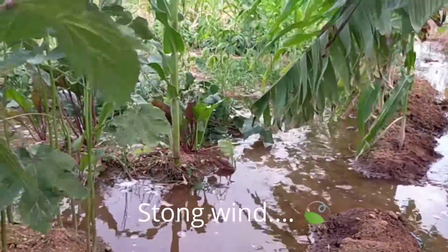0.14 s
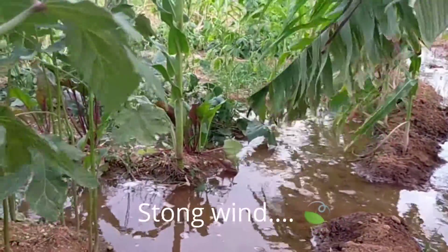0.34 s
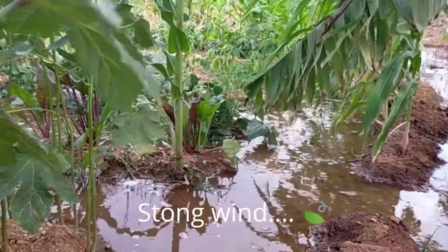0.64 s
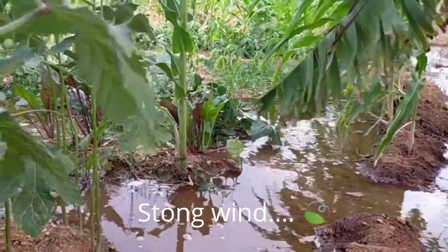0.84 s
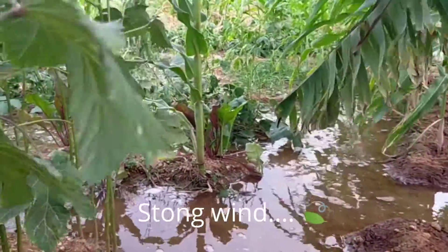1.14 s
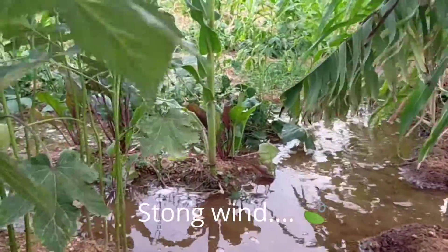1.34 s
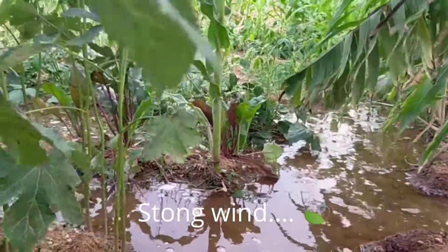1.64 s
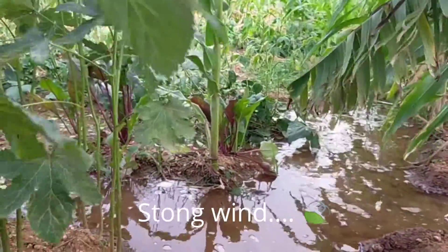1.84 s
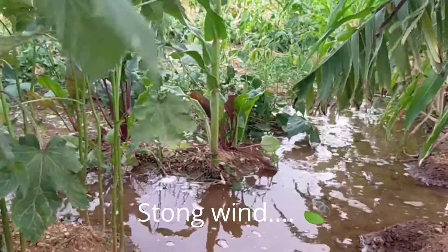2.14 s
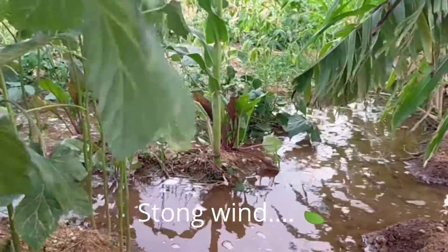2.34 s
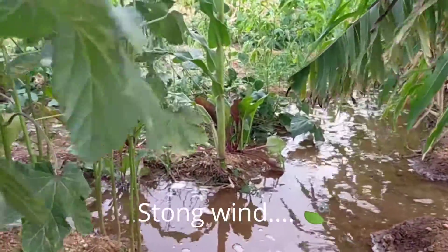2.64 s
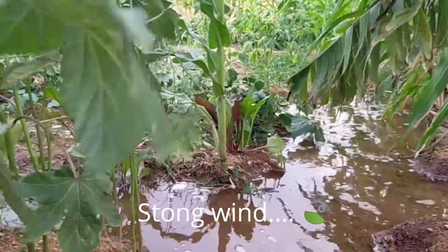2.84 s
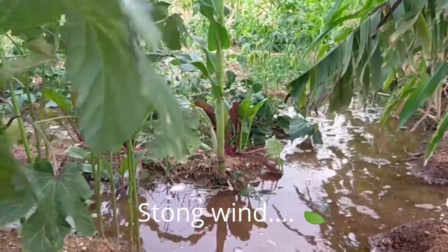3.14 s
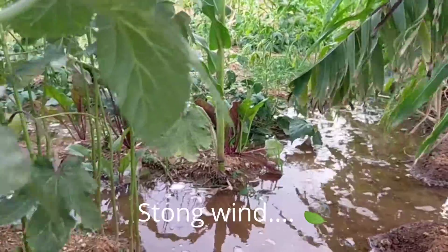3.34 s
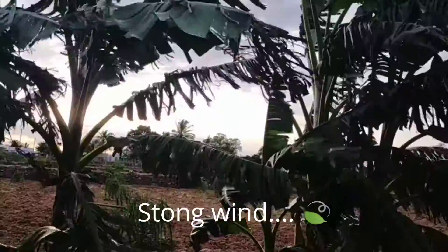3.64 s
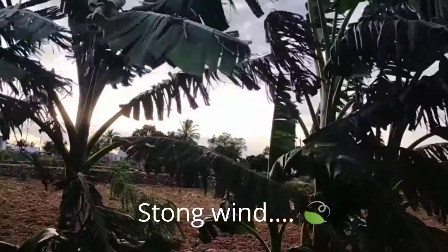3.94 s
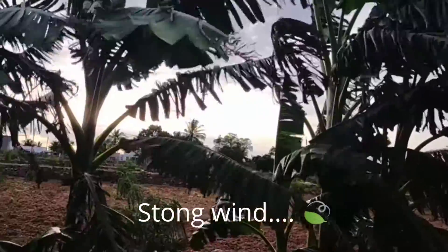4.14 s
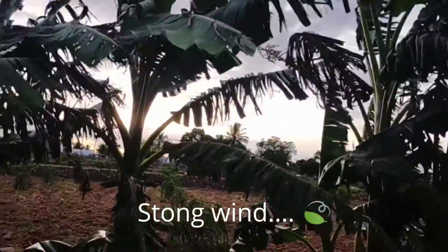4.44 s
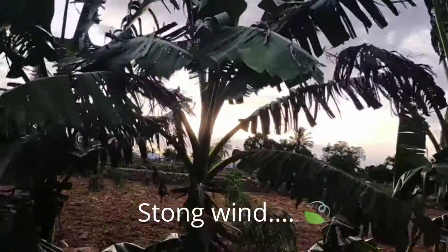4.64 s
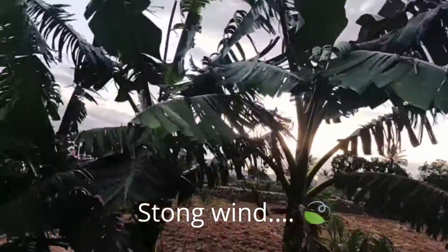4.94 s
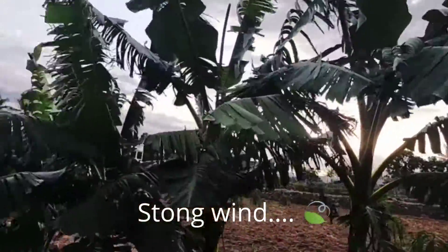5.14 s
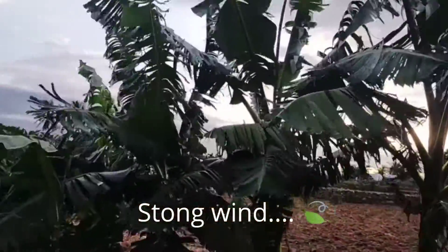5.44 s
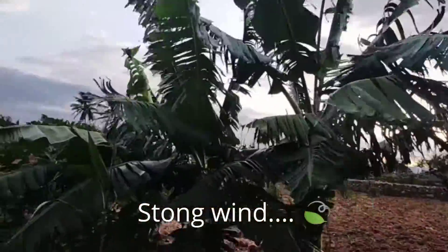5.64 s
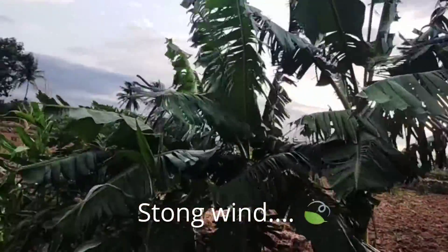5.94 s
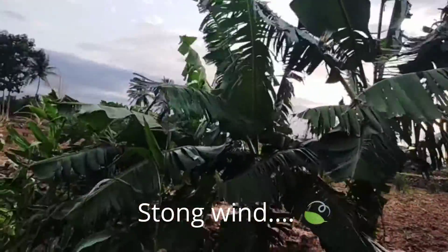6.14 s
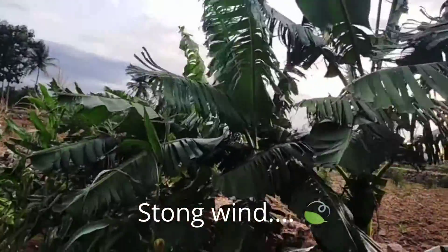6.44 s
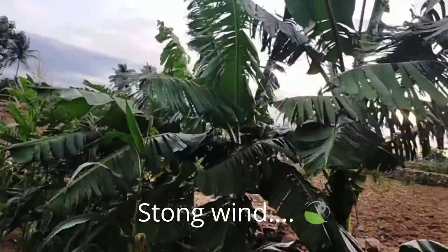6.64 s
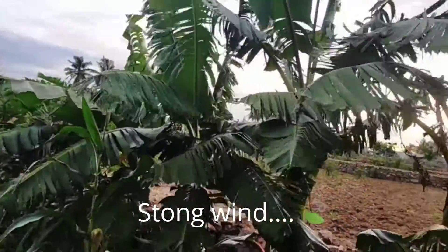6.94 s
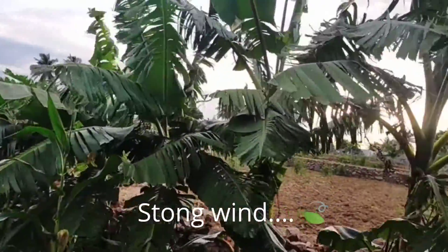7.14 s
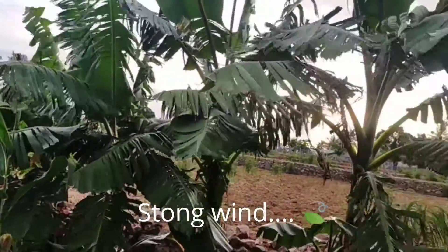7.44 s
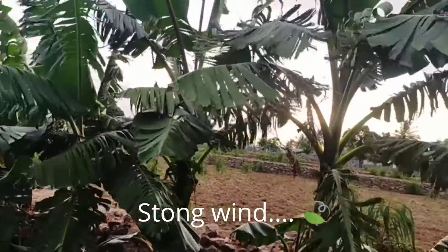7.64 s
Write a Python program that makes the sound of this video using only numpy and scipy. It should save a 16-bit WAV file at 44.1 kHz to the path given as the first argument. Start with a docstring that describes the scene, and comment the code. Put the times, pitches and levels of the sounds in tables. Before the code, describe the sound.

Strong wind in a garden sets maize leaves rustling in a dense, ticking hiss from the start, while uneven gusts rumble on the microphone. Single leaves slap close by, and dry ones snap sharply at about 1.8 and 2 seconds. Low thumps of wind strike near 1.6, 2.7 and 3.1 seconds, with the hardest buffeting around 3.5 seconds. At 3.7 seconds the sound changes abruptly to a slightly quieter banana grove. Torn leaf strips patter against each other over a fluttering hiss, with frequent light slaps and occasional small cracks, and the wind on the microphone is much softer. Two faint, brief, thin whistles sound far off at about 4.5 and 4.9 seconds. Between 5 and 6 seconds the hiss grows a little duller as the microphone turns aside. Rustling, tapping and light gusts continue until the end, near 7.8 seconds.

```python
"""Strong wind in a garden. First maize rustles, countless leaf contacts summing to a dense hiss,
while turbulence buffets the microphone; single leaves slap and dry ones snap close by.
At 3.7 s the place changes abruptly to a quieter banana grove, whose torn leaf strips patter
against each other. Two faint whistles sound far off, and the colour of the hiss shifts
as the microphone is turned aside."""
import sys
import numpy as np
from scipy import signal
from scipy.fft import rfft, irfft, next_fast_len
from scipy.io import wavfile
from scipy.ndimage import uniform_filter1d

SR = 44100
rng = np.random.default_rng(int(sys.argv[2]) if len(sys.argv) > 2 else 0)


def materialize(psi):
    """Save the field psi as 16-bit PCM at rate SR to the path in sys.argv[1].

    A 1-D psi becomes a single channel; in a 2-D psi each row is a channel.
    """
    bounded = np.clip(np.atleast_2d(psi).T, -1, 1)
    quanta = np.round(bounded * 32767).astype(np.int16)
    wavfile.write(sys.argv[1], SR, quanta)


N = 343539
T = np.arange(N) / SR


def amp(db):
    """Amplitude ratio of a level in decibels."""
    return 10 ** (np.asarray(db) / 20)


def unit(x):
    """Normalisation to an rms of 1."""
    return x / np.sqrt(np.mean(x ** 2) + 1e-20)


def curve(rows, t):
    """Linear interpolation of each column of a time table at the times t."""
    times, *columns = np.transpose(rows)
    return [np.interp(t, times, column) for column in columns]


def spectrum_db(points, hz):
    """Interpolation of a spectrum on a logarithmic frequency axis."""
    point_hz, db = np.transpose(points)
    return np.interp(np.log(hz + 1), np.log(point_hz + 1), db)


def add(mix, start, sound):
    """Superposition: a sound joins the mix at its start time in seconds."""
    part = mix[max(round(start * SR), 0):][:len(sound)]
    part += sound[:len(part)]


def colour(x, points):
    """Linear filtering: the spectrum is multiplied by a gain curve."""
    size = next_fast_len(len(x))
    gain = amp(spectrum_db(points, np.fft.rfftfreq(size, 1 / SR)))
    return irfft(rfft(x, size) * gain, size)[:len(x)]


def short_spectra(x):
    """Short-time Fourier analysis: frequencies, times and spectra (bins x frames)."""
    return signal.stft(x, SR, nperseg=512, noverlap=384)


def waveform(spectra):
    """Overlap-add synthesis of sound from short-time spectra."""
    return signal.istft(spectra, SR, nperseg=512, noverlap=384)[1][:N]


def patches(shape, size):
    """Correlated noise of rms 1: a moving average over size = (bins, time steps)."""
    across_bins = uniform_filter1d(rng.standard_normal(shape), size[0], axis=0)
    return unit(uniform_filter1d(across_bins, size[1], axis=1))


def fluctuation(samples):
    """Random modulation of rms 1, correlated over the given number of samples."""
    return patches((1, N), size=(1, samples))[0]


def scatter(x, t60, wet_db):
    """Diffuse scattering: surrounding leaves return a short, exponentially decaying tail."""
    t = T[:4096]
    tail = rng.standard_normal(len(t)) * amp(-60 * t / t60) * (t > .001)
    return x + amp(wet_db) * signal.oaconvolve(x, tail / np.linalg.norm(tail))[:N]


def leaf_contact(hz, length):
    """Damped oscillation: one contact excites a few cycles that swell fast and die."""
    t = T[:1024]
    age = 3 * t / length
    return age * np.exp(1 - age) * np.sin(2 * np.pi * hz * t)


def patter(per_s, low_hz, high_hz, cycles, spread_db):
    """Shot noise: leaves of many pitches touch at random, a few of them hard."""
    out = np.zeros(N)
    pitches = np.geomspace(low_hz, high_hz, 32)
    for hz in pitches:
        when, strength, chance = rng.random((3, 1500))
        weight = np.minimum(-np.log(strength + 1e-9), 3)  # capped exponential distribution
        touches = chance < per_s * N / SR / len(pitches) / len(when)
        hits = np.bincount((when * N).astype(int), amp(spread_db * weight) * touches, N)
        length = cycles * rng.uniform(0.53, 2.4) / hz
        out += signal.oaconvolve(hits, leaf_contact(hz, length))[:N]
    return unit(out)


def crackling(per_s, spread_db):
    """Random impulses: dry leaf edges catch in clicks too brief to have a pitch."""
    # spectrum of the catching edges: (frequency [Hz], relative level [dB])
    edge_spectrum = [(500, -16), (2500, -10), (5000, -3), (7000, -6), (10000, 3), (15000, -3)]
    strength, chance, sign = rng.random((3, N))
    weight = np.minimum(-np.log(strength + 1e-9), 3.5)
    clicks = amp(spread_db * weight) * np.sign(sign - .5) * (chance < per_s / SR)
    return unit(colour(scatter(clicks, t60=0.011, wet_db=-5.5), edge_spectrum))


def maize():
    """Incoherent summation: many thin leaves merge into a hiss, the nearer ones ticking through it."""
    # strength of the wind-driven rustle: (time [s], relative level [dB])
    rustle_levels = [(0, -40.3), (.2, -41), (.7, -41), (1.15, -42.5), (1.39, -41), (2, -43), (2.45, -42.5),
                     (2.9, -43), (3.69, -41.8)]
    # spectrum of the rustle: (frequency [Hz], relative level [dB])
    rustle_spectrum = [(100, -20), (300, -7), (480, -10.5), (1000, -7), (1600, -5), (2150, 0.5), (2650, -1),
                       (3350, -14.5), (4150, -15), (5300, -5.5), (6600, -5), (8100, -19), (9600, -16.5),
                       (13200, -18.5), (15000, -19)]
    ticks = amp(-17.5) * patter(per_s=300, low_hz=1303, high_hz=3090, cycles=1.96, spread_db=4.0)
    crackle = amp(-11) * crackling(per_s=300, spread_db=9.0)
    hz, _, spectra = short_spectra(rng.standard_normal(N) + ticks + crackle)
    flicker_db = 1.1 * patches(spectra.shape, size=(10, 14))
    spectra *= amp(spectrum_db(rustle_spectrum, hz)[:, None] + flicker_db)
    rustle_db, = curve(rustle_levels, T)
    return unit(waveform(spectra)) * amp(rustle_db + 5.0)


def airflow_db():
    """Addition of powers: gusts swell and die on top of a fluttering breeze."""
    # breeze on the microphone between gusts: (time [s], relative level [dB])
    breeze_levels = [(0, -49.5), (.45, -44), (.95, -55.5), (1.5, -45.5), (1.95, -52.5), (2.25, -54),
                     (2.55, -47), (3.6, -46.5), (4.2, -57), (5.25, -53), (6.1, -60.5), (6.65, -58.5),
                     (7.79, -61)]
    # gusts on the microphone: (peak time [s], relative level [dB], duration [s])
    gusts = [(0.237, -37, 0.1), (0.32, -36.5, 0.11), (.55, -46, .06), (0.737, -40.5, 0.098),
             (1.07, -41.5, .09), (1.32, -44, .06), (1.645, -35.5, .14), (2.715, -38, 0.12),
             (3.08, -38.5, 0.076), (3.253, -38.5, .07), (3.465, -23.5, 0.074), (3.647, -34.5, .06),
             (3.764, -42, 0.15), (4.138, -49, 0.08), (4.348, -48, .04), (4.554, -48.5, 0.11),
             (4.69, -45, .07), (4.92, -46.5, 0.14), (5.117, -50, 0.065), (5.6, -49, .17),
             (5.888, -53, 0.055), (6.475, -52, 0.056), (6.877, -46.5, 0.18), (7.32, -52.5, 0.045),
             (7.425, -57.5, 0.045), (7.78, -43.5, 0.07)]
    flutter_db = 2.5
    rise_share, edge_db = .45, 7  # part of a gust spent rising; depth of its ends below the peak
    breeze_db, = curve(breeze_levels, T)
    power = amp(breeze_db + flutter_db * fluctuation(samples=2600)) ** 2
    for peak_time, db, length in gusts:
        from_peak = np.maximum((peak_time - T) / rise_share, (T - peak_time) / (1 - rise_share)) / length
        near = from_peak < 4
        power[near] += amp(db - edge_db * from_peak[near] ** 1.6) ** 2
    return 10 * np.log10(power)


def buffeting():
    """Turbulent pressure on the microphone: harder gusts carry smaller eddies and sound higher."""
    # rumble of a light gust: (frequency [Hz], relative level [dB])
    light_spectrum = [(8, -6.5), (22, 7.5), (45, 1), (85, -1.5), (130, -12), (200, -16.5), (320, -27),
                      (700, -44), (2000, -90)]
    # rumble of a hard gust: (frequency [Hz], relative level [dB])
    hard_spectrum = [(8, -12), (25, -4), (50, -10), (85, 10), (135, -0.5), (190, -1), (260, -19),
                     (340, -14.5), (480, -41), (900, -57), (2000, -90)]
    hard_from_db, hard_range_db, pickup_db = -35.5, 8, -3
    air_db = airflow_db()
    hardness = np.clip((air_db - hard_from_db) / hard_range_db, 0, 1)
    puffs = rng.standard_normal(N) * amp(3.0 * fluctuation(samples=900))
    light, hard = unit(colour(puffs, light_spectrum)), unit(colour(puffs, hard_spectrum))
    rumble = (1 - hardness) * light + hardness * hard
    audible = signal.sosfiltfilt(signal.butter(2, 40, "high", fs=SR, output="sos"), rumble)
    running_rms = np.sqrt(uniform_filter1d(audible ** 2, size=4000) + 1e-6)
    return rumble / running_rms * amp(air_db + pickup_db)  # the airflow alone sets the strength


def slaps():
    """Impact and friction: a hollow pat, and a scuff that lasts as long as the leaves touch."""
    # loudest leaf collisions: (time [s], relative level [dB], frequency [Hz], duration [s])
    collisions = [(0.528, -28.5, 2550, 0.0026), (1.807, -24.5, 2290, 0.0015), (1.968, -24.5, 2120, 0.002),
                  (2.277, -31, 2410, 0.0033), (2.411, -28, 2300, .0017), (3.264, -28, 1470, 0.0017),
                  (3.797, -32, 1790, .003), (4.066, -32, 3320, 0.001), (4.376, -34, 3250, 0.0016),
                  (4.499, -38, 2360, .011), (4.681, -29.5, 3280, 0.0018), (4.758, -34, 3140, 0.0026),
                  (4.867, -33.5, 2220, 0.024), (5.0997, -24.5, 2510, 0.00046), (5.164, -36.5, 2290, .012),
                  (5.177, -34.5, 2070, .015), (5.256, -35.5, 1300, .0016), (5.454, -38, 1830, 0.0036),
                  (5.554, -26.5, 2370, 0.0012), (5.675, -26, 2150, 0.0036), (5.696, -30, 2150, .0039),
                  (5.957, -35, 2090, .0035), (6.085, -24.5, 2070, 0.0029), (6.288, -38, 2060, .0025),
                  (6.462, -33, 2040, 0.003), (6.6495, -39, 2470, 0.0029), (6.699, -29.5, 2200, 0.0045),
                  (6.7554, -34.5, 1920, 0.0047), (7.134, -37, 2350, .003), (7.2075, -34.5, 2550, 0.0036),
                  (7.274, -34.5, 2570, .0028), (7.32, -31, 2390, .002), (7.421, -34, 2390, .0024),
                  (7.515, -35.5, 2380, .006), (7.564, -30, 2710, 0.0014), (7.58, -34, 1760, .005),
                  (7.685, -35, 2560, .002)]
    # friction noise of two leaves meeting: (frequency [Hz], relative level [dB])
    scuff_spectrum = [(300, -20), (900, -14), (2200, 6), (3500, 0), (5000, -32), (15000, -34)]
    out = np.zeros(N)
    for start, db, hz, length in collisions:
        pat = leaf_contact(hz, min(length, .004))
        age = 3 * T[:len(pat)] / max(length, .001)
        friction = unit(colour(rng.standard_normal(len(pat)), scuff_spectrum))
        scuff = friction * age * np.exp(1 - age)
        add(out, start, amp(db) * (pat + amp(-10) * scuff))
    return amp(1.8) * scatter(out, t60=.03, wet_db=-14)


def thumps():
    """Pressure pulses: a single eddy gives the microphone a quick push, then a shallow suction."""
    # eddies striking the microphone: (time [s], peak level [dB], time constant [s])
    eddies = [(1.615, -26.5, 0.0065), (2.7002, -24.5, 0.00077), (2.722, -34, 0.019), (3.077, -25, 0.01),
              (3.431, -21.5, .0043), (3.475, -18, 0.0034), (3.643, -26, 0.0072)]
    out = np.zeros(N)
    for start, db, time_constant in eddies:
        age = T[:8192] / time_constant
        pressure = age * (1 - age / 2) * np.exp(-age)
        add(out, start, amp(db) * pressure / pressure.max())
    return out


def snaps():
    """Brittle fracture: a dry leaf cracks in a bright burst about a millisecond long."""
    # leaves cracking close by: (time [s], peak level before scattering [dB])
    fractures = [(1.8047, -17), (1.827, -21), (1.9452, -26), (1.9669, -9), (1.982, -24), (4.052, -33),
                 (4.138, -30), (4.4732, -32), (4.9393, -28.5), (5.069, -26), (5.7875, -28.5), (6.5041, -36)]
    # spectrum of a crack: (frequency [Hz], relative level [dB])
    crack_spectrum = [(500, -36), (2000, -28), (3500, -13), (5500, -7.5), (7700, -16), (9300, 0.5),
                      (11200, 1.5), (13000, -9), (15000, -7.5)]
    out, t = np.zeros(N), T[:512]
    lead = 64  # samples of room for the filter's spread ahead of the burst
    for start, db in fractures:
        splits = rng.choice([-1., 1.], len(t)) * np.exp(-t / .0006)
        crack = colour(np.pad(splits, (lead, 0)), crack_spectrum)
        add(out, start - lead / SR, amp(db) * crack / abs(crack).max())
    return scatter(out, t60=0.061, wet_db=-11.5)


def grove():
    """Directional pickup: the microphone's heading colours the banana leaves' hiss and patter."""
    # strength of the wind-driven rustle: (time [s], relative level [dB])
    rustle_levels = [(3.71, -41), (4.14, -44), (4.73, -46), (5.22, -45), (5.61, -42), (6.65, -42),
                     (6.87, -42.5), (7.43, -41), (7.79, -42.5)]
    # rustle with the microphone facing the first trees: (frequency [Hz], relative level [dB])
    facing_spectrum = [(120, -10.5), (480, -9.5), (850, -3.5), (1050, -4.5), (1400, -2.5), (2300, 1.5),
                       (3350, 2), (4150, -7), (5200, -9), (6300, -9.5), (7900, -17), (10500, -12.5),
                       (13500, -18), (15000, -15.5)]
    # rustle with the microphone turned aside: (frequency [Hz], relative level [dB])
    aside_spectrum = [(120, -12), (450, -13.5), (820, -8.5), (1050, -10.5), (1600, -8), (2350, 1.5),
                      (3300, -5.5), (4100, -17), (5100, -22.5), (6100, -18), (8250, -26), (9500, -17.5),
                      (13200, -25), (15000, -23.5)]
    # microphone heading: (time [s], share turned aside [0-1], treble peak [Hz], peak gain [dB])
    headings = [(3.7, 0.33, 10300, 6), (4.3, 0.04, 10500, 6), (4.65, 0, 10700, 8.5), (5.1, 0.16, 10800, 5),
                (5.3, 0.36, 9900, 9.5), (5.5, 0.63, 9300, 5), (5.9, 1, 10100, 1.5), (7.79, 1, 10200, -0.5)]
    flurries = amp(1.3 * fluctuation(samples=2200))
    strips = amp(-12.0) * patter(per_s=330, low_hz=1220, high_hz=3650, cycles=4.9, spread_db=3.0)
    crackle = amp(-5) * crackling(per_s=280, spread_db=6.0)
    hiss = rng.standard_normal(N) * amp(1.6 * fluctuation(samples=350))  # whole blades brush together
    hz, t, spectra = short_spectra(hiss + flurries * (strips + crackle))
    hz = hz[:, None]
    aside, peak_hz, peak_db = curve(headings, t)
    heading_db = (1 - aside) * spectrum_db(facing_spectrum, hz) + aside * spectrum_db(aside_spectrum, hz)
    treble_db = peak_db * np.exp(-((hz - peak_hz) / 850) ** 2)
    sizzle_db = 7 * (1 - aside) ** 2 * np.exp(-((hz - 0.472 * peak_hz) / 450) ** 2)  # about an octave down
    flicker_db = 1.12 * patches(spectra.shape, size=(4, 14))
    spectra *= amp(heading_db + treble_db + sizzle_db + flicker_db)
    rustle_db, = curve(rustle_levels, T)
    return unit(waveform(spectra)) * amp(rustle_db - 0.17)


def whistles():
    """Frequency and amplitude modulation: a wavering tone's pitch and level follow one arch."""
    # faint, thin notes far off: (time [s], duration [s], top frequency [Hz], peak level [dB])
    notes = [(4.524, 0.115, 1328, -49), (4.87, 0.107, 1300, -50)]
    arch_depth = 0.084  # share of the top frequency by which a note rises and falls
    out = np.zeros(N)
    for start, length, top_hz, db in notes:
        arch = np.sin(np.pi * T[T < length] / length)
        waver = 1 + 0.021 * fluctuation(samples=150)[:len(arch)]
        hz = top_hz * (1 - arch_depth * (1 - arch)) * waver
        add(out, start, amp(db) * arch * np.sin(2 * np.pi * np.cumsum(hz) / SR))
    return out


def scene():
    """Superposition in one channel: maize, then the grove, with wind on the microphone throughout."""
    grove_from_s = 3.694
    leaves = np.where(T < grove_from_s, maize(), grove())
    return (leaves + slaps() + snaps() + buffeting() + thumps() + whistles())[None]


def record(dry):
    """Band limiting: a linear-phase low-pass filter removes the highest treble."""
    cutoff_hz = 15150
    lowpass = signal.firwin(801, cutoff_hz, window=("kaiser", 8), fs=SR)
    return signal.oaconvolve(dry, lowpass[None], "same")


dry = scene()
out = record(dry)
materialize(out)
```